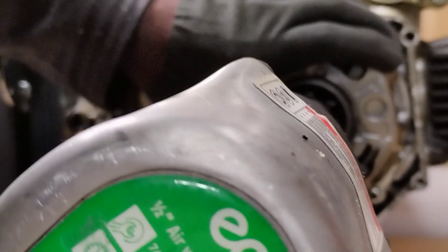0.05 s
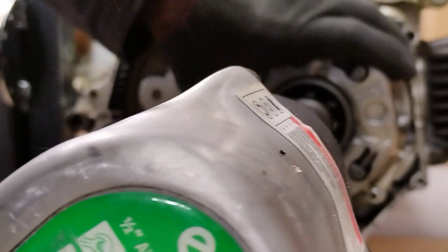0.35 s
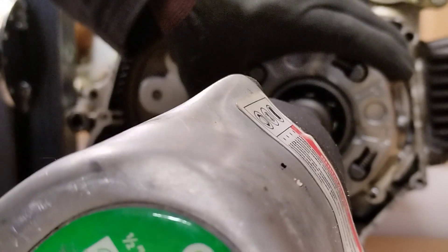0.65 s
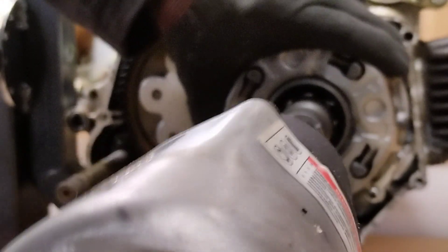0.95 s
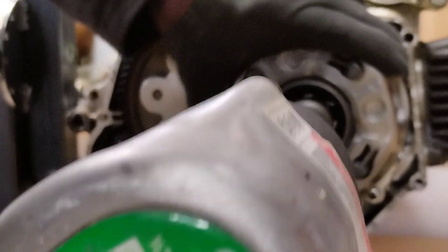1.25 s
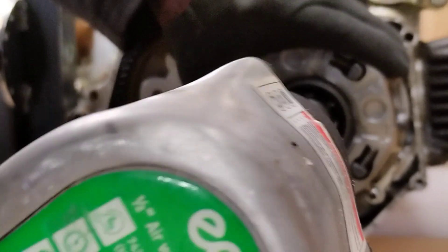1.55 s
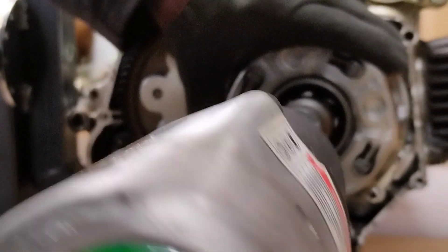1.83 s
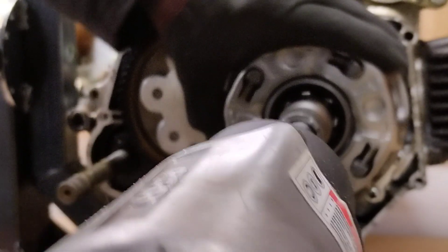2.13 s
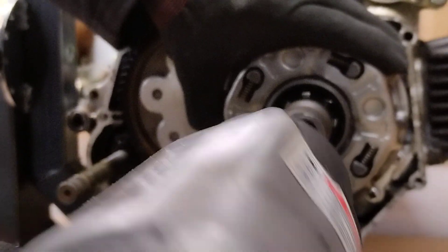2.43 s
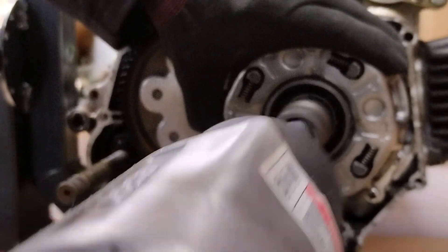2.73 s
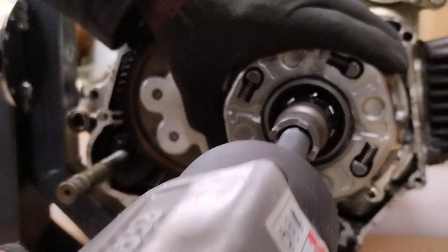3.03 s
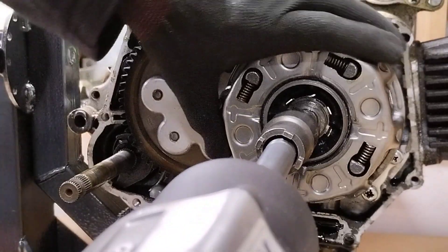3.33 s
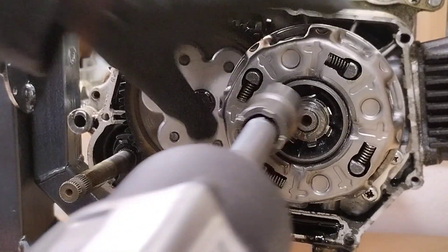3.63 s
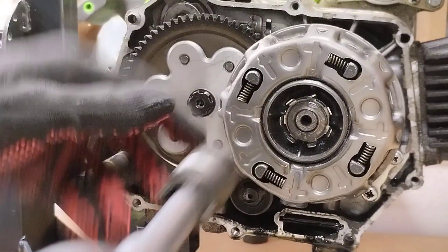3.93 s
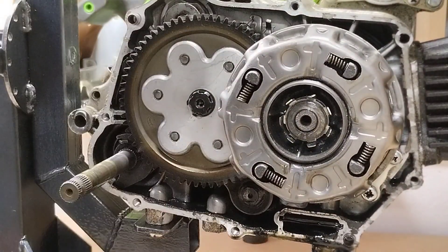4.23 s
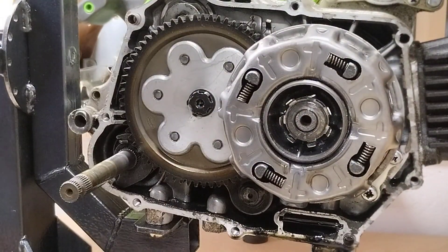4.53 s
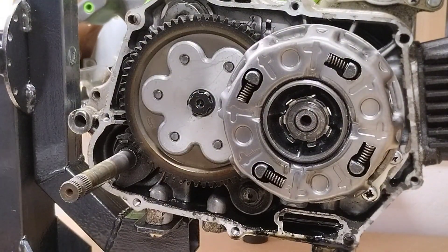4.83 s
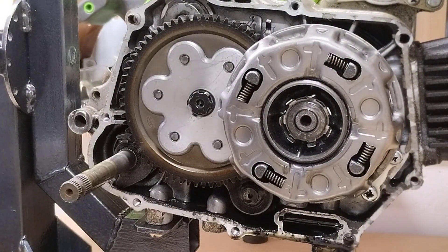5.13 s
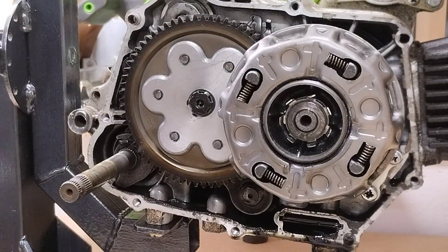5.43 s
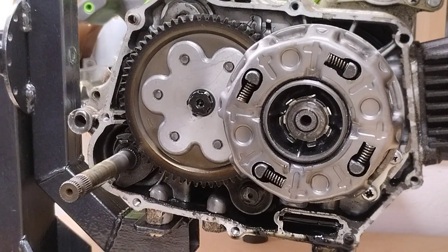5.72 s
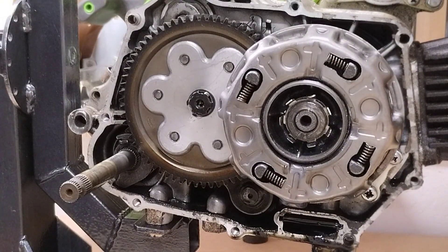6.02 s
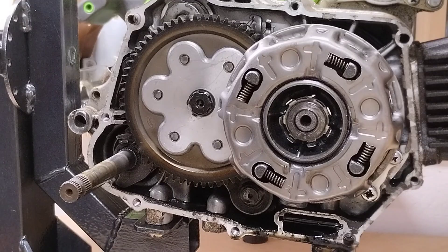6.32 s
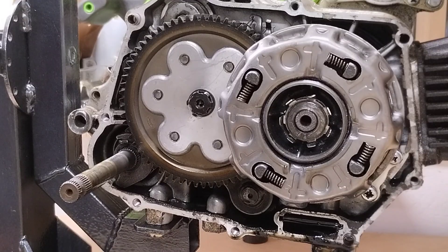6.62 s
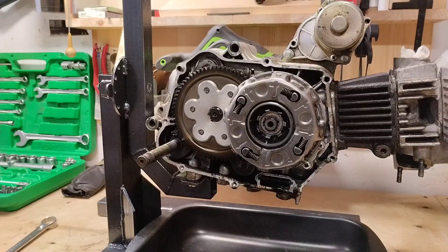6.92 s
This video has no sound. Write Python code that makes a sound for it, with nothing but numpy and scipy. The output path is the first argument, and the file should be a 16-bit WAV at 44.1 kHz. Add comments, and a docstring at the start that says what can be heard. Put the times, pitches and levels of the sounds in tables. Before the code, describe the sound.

Short hissing, clacking bursts of an air impact wrench loosen a nut, followed by small clinks and a tool thudding onto a wooden bench.

```python
"""In a workshop, an air impact wrench undoes a small engine's clutch nut in five pulls of the trigger.
Air hisses in and spins a motor, whose vanes (sliding blades) each let out a puff. A steel hammer strikes
and stalls the motor again and again, until the nut runs free and the motor coasts down.
The nut rattles, the socket clinks off the shaft, and the wrench is laid on the wooden bench.
Gloves rustle, moving air rumbles softly, and the room adds a short echo."""
import sys
import numpy as np
from scipy import signal
from scipy.fft import rfft, irfft, next_fast_len
from scipy.io import wavfile

SR = 44100
rng = np.random.default_rng(int(sys.argv[2]) if len(sys.argv) > 2 else 0)


def materialize(psi):
    """Save the field psi as 16-bit PCM at rate SR to the path in sys.argv[1].

    A 1-D psi becomes a single channel; in a 2-D psi each row is a channel.
    """
    bounded = np.clip(np.atleast_2d(psi).T, -1, 1)
    quanta = np.round(bounded * 32767).astype(np.int16)
    wavfile.write(sys.argv[1], SR, quanta)


N = 311787
T = np.arange(N) / SR
NUT_FREE_S = 2.582
HISS_FOLLOWS = 0.5   # dB of exhaust hiss per dB of drive (how hard the motor is pushed)

# Table levels are relative: each function adds its own gain. A t60 is the time taken to fade by 60 dB.
# trigger pulls: press/s, let go/s, inrush/dB, gust afterwards/dB
PULLS = [(.911, 1.033, -20.5, -26), (1.261, 1.487, -8.5, -26.5), (1.699, 1.938, -8.5, -23),
         (2.134, 2.288, -4.5, -30.5), (2.507, 2.649, -22, -11)]
# hammer strokes: slip/s, spin-up/s, top speed/(puffs per s), drive/dB, landing/dB
STROKES = [(.977, 0.041, 257, -3.5, 2), (1.292, 0.044, 235, -5, -1), (1.366, .0426, 260, -4, 3.5),
           (1.4385, .0425, 235, -4, 0.5), (1.7159, .042, 252, -1, 0), (1.803, 0.036, 225, -5, -1.5),
           (1.886, .0424, 230, -4, -2), (2.153, 0.031, 263, 1.5, -1.5), (2.2383, 0.04, 244, -2.5, 2),
           (2.5368, 0.042, 200, 1.5, 0)]
# lone blows that only jog the motor: t/s, peak/dB, drive/dB
LONE_BLOWS = [(0.9346, 5.5, -5.5), (1.265, -4, 2.5), (1.305, -7.5, -15), (2.3203, -6.5, -9.5),
              (2.4035, -7, -27), (2.5178, -2, -26.5)]
# the coasting motor: t/s, exhaust/dB, bearings/dB
COAST = [(2.655, -32, -26), (2.695, -16, -24), (2.727, -18, -34.5), (2.745, -8.5, -22.5),
         (2.857, -18.5, -40.5), (2.921, -34.5, -42), (2.97, -46, -61)]
# things set on the bench: t/s, clatter/dB, thump/dB, hollow ring/dB
KNOCKS = [(5.023, -45.5, -43.5, -65), (5.408, -42.5, -69, -63), (5.516, -18, -24.5, -19),
          (5.545, -23, -24, -16.5), (5.753, -6, -18, -36), (5.773, -16.5, -8.5, -28.5),
          (6.294, -37.5, -58, -54)]
# the bright tick of a hard contact: f/Hz, level/dB
TICK_SPECTRUM = [(3000, -5.5), (5500, -6), (7200, 2), (8400, 4.5), (9500, -0.5), (11000, -5), (13500, -9),
                 (16000, -11.5)]


def from_db(db):
    """Turn decibels into a factor to multiply by."""
    return 10 ** (np.asarray(db) / 20)


def rms_one(x):
    """Scale a signal to an average strength (rms) of 1."""
    return x / np.sqrt(np.mean(x ** 2) + 1e-20)


def in_time(rows):
    """Join timed rows with straight lines, giving one curve for each value column."""
    times, *columns = np.transpose(rows)
    return [np.interp(T, times, column) for column in columns]


def at_hz(points, hz):
    """Read a table between its listed frequencies."""
    frequencies, values = np.transpose(points)
    return np.interp(np.log(hz), np.log(frequencies), values)


def noise(spectrum):
    """Noise of strength 1, shaped by rows of f/Hz, level/dB and falling steeply beyond them."""
    padded = next_fast_len(N)
    hz = np.fft.rfftfreq(padded, 1 / SR) + 1e-3
    skirts = 1 / np.sqrt((1 + (.8 * spectrum[0][0] / hz) ** 8) * (1 + (.8 * hz / spectrum[-1][0]) ** 8))
    shaped = rfft(rng.standard_normal(padded)) * from_db(at_hz(spectrum, hz)) * skirts
    return rms_one(irfft(shaped, padded)[:N])


def clicks(times, level_db):
    """Silence with a one-sample click at each given time."""
    out = np.zeros(N)
    out[(np.asarray(times) * SR).astype(int)] = from_db(level_db)
    return out


def fading(x, t60):
    """Turn every click into a loudness curve that dies away."""
    return signal.lfilter([1], [1, -from_db(-60 / (t60 * SR))], x + 1e-18)


def swell(middle, length):
    """A smooth rise and fall."""
    return np.exp(-np.minimum((2 * (T - middle) / length) ** 2, 50))


def ring(x, hz, t60):
    """Every click starts a pure tone that dies away."""
    decay, angle = from_db(-60 / (t60 * SR)), 2 * np.pi * hz / SR
    return signal.lfilter([0, np.sin(angle)], [1, -2 * decay * np.cos(angle), decay ** 2], x + 1e-18)


def struck(times, level_db, modes, spread_db):
    """Each blow rings an object's modes (its natural tones), each with a partly random strength."""
    out = 0
    for hz, db, t60 in modes:
        scatter_db = spread_db * rng.standard_normal(len(times))
        out = out + ring(clicks(times, level_db + db + scatter_db), hz, t60)
    return out


def resonate(x, resonances):
    """Pick out bands (f/Hz, width/Hz, level/dB) and add them with alternating signs."""
    out = 0
    for k, (hz, width, db) in enumerate(resonances):
        decay = np.exp(-np.pi * width / SR)
        feedback = [1, -2 * decay * np.cos(2 * np.pi * hz / SR), decay ** 2]
        band = signal.lfilter([1, 0, -1], feedback, x + 1e-18)
        out = out + (-1) ** k * from_db(db) * (1 - decay ** 2) / 2 * band
    return out


def background(level_db=-63):
    """A faint, steady rumble and hiss."""
    # the quiet room: f/Hz, level/dB
    room_spectrum = [(35, -37), (60, -9.5), (76, -10.5), (149, -15), (233, -14), (579, -20), (1250, -24.5),
                     (5090, -31.5), (8510, -28), (14600, -37.5), (16000, -47.5)]
    return from_db(level_db) * noise(room_spectrum)


def draught(level_db=5, shake_db=-8, shake_t60=0.66, blast_db=1, blast_rise_s=0.0044, blast_t60=0.16):
    """Slow pressure swings on the microphone: room air, gusts, the shaking bench, the freed motor."""
    # drifting room air: t/s, level/dB
    drift = [(0, -34), (.9, -42), (2.4, -40), (3.3, -28.5), (4.0, -44), (4.9, -45.5), (5.2, -39.5),
             (6.1, -32), (6.6, -47), (7.07, -35)]
    # the rumble of moving air: f/Hz, level/dB
    rumble = [(4, 10.5), (12, 6), (25, -12.5), (50, -15), (100, -32.5), (200, -40.5), (400, -59.5)]
    gusts = sum(from_db(db) * swell(let_go + 0.1, length=0.32) for _, let_go, _, db in PULLS)
    times, _, thump_db, _ = np.transpose(KNOCKS)
    shaking = fading(clicks(times, thump_db + shake_db), shake_t60)
    since = np.maximum(T - NUT_FREE_S + blast_rise_s, 0)
    blast = (1 - np.exp(-since / blast_rise_s)) * from_db(blast_db - 60 * since / blast_t60)
    return from_db(level_db) * (from_db(in_time(drift)[0]) + gusts + shaking) * noise(rumble) - blast


def handling(swish_db=-2, rub_db=-3, grain_db=3.5, resting_db=-73):
    """Gloves, sleeve and hose slide in small uneven slips."""
    # movements: middle/s, length/s, swish/dB, rub/dB
    moves = [(0.0, 0.08, -55, -60), (0.31, 0.32, -54.5, -60), (.5, 0.044, -64, -66),
             (3.45, 0.061, -70, -61), (3.861, 0.12, -75, -56.5), (4.162, 0.064, -60, -72),
             (4.572, 0.18, -55, -53.5), (4.76, 0.1, -67, -73), (5.265, 0.33, -63, -65.5),
             (6.2, 0.056, -72, -64), (7.022, 0.17, -57, -66)]
    # the bright swish and the duller rub: f/Hz, level/dB
    swish_spectrum = [(1760, -28.5), (3000, -7.5), (3240, -2), (3730, -7.5), (5400, -6), (8520, 3),
                      (14300, -13.5), (16000, -20)]
    rub_spectrum = [(550, -2.5), (1200, 1.5), (2000, -3), (3000, -10.5), (5000, -16)]
    swish = rub = from_db(resting_db)
    for middle, length, high_db, low_db in moves:
        move = swell(middle, length)
        swish = swish + from_db(high_db) * move
        rub = rub + from_db(low_db) * move
    slips = from_db(grain_db * noise([(5, 0.5), (150, -12.5)]))
    swish = from_db(swish_db) * swish * noise(swish_spectrum)
    rub = from_db(rub_db) * rub * noise(rub_spectrum)
    return slips * (swish + rub)


def clinks(tick_db=-2, tick_t60=0.037, body_t60=0.027, socket_db=-18, give_s=0.0063, touches_per_s=1.5):
    """Light metal contacts; pulling the socket off also sets the clutch drum humming."""
    # socket, nut and tool touching: t/s, tick/dB, body/dB
    contacts = [(0.19, -38.5, -41.5), (2.738, -17, -28), (2.82, -14, -22.5), (2.902, -19, -21.5),
                (2.921, -26, -38), (2.998, -35, -32.5), (3.02, -54, -29.5), (3.122, -60, -39.5),
                (3.195, -25.5, -15.5), (3.229, -34, -38), (3.592, -49, -62), (4.189, -21.5, -31.5),
                (4.242, -27, -25.5), (4.246, -23, -38), (4.591, -58, -34.5), (5.262, -35.5, -34.5),
                (5.649, -36.5, -34)]
    # the lower body of a clink: f/Hz, level/dB
    body_spectrum = [(1300, -7), (1750, 6.5), (2100, -1), (2500, -1.5), (3100, -4), (4500, -16.5)]
    # nudges to the clutch drum: t/s, level/dB
    drum_nudges = [(3.2, -23.5), (3.434, -40)]
    # tones of the socket and of the drum: f/Hz, level/dB, t60/s
    socket_modes = [(1040, -9.5, .1), (1510, -9.5, .1), (1950, -8.5, .08), (2092, -4, 0.076),
                    (3074, -10.5, .08), (7500, -12, .07), (8170, -8, .07)]
    drum_modes = [(133, -3.5, 0.13), (218.3, -14.5, 0.32), (271, -6.5, 0.21), (375.8, 2.5, 0.22),
                  (506, -6, 0.12)]
    touch_times = T[rng.random(N) < touches_per_s / SR]
    faint_touches = [(t, *rng.normal(-59.5, 2.5, 2)) for t in touch_times]
    times, peak_db, low_db = np.transpose(contacts + faint_touches)
    tick = fading(clicks(times, peak_db + tick_db), tick_t60) * noise(TICK_SPECTRUM)
    body = fading(clicks(times, low_db), body_t60) * noise(body_spectrum)
    nudges = clicks(*np.transpose(drum_nudges))
    rise_t60 = give_s * np.log(1000)   # the drum takes up its vibration gradually from the shaft
    drum = sum(from_db(db) * (ring(nudges, hz, t60) - ring(nudges, hz, rise_t60))
               for hz, db, t60 in drum_modes)
    return tick + body + drum + struck(times, low_db + socket_db, socket_modes, spread_db=8.0)


def trigger(opening_t60=0.026, filling_t60=0.063):
    """The hiss swells as the valve cracks open and fades as the motor chamber fills."""
    # air rushing in: f/Hz, level/dB
    inrush_spectrum = [(250, 2.5), (700, -5), (1000, -5), (1260, 5), (1550, -4), (2050, -3), (2550, 4),
                       (3200, -12), (5000, -8.5), (9000, -8), (16000, -21)]
    times, _, inrush_db, _ = np.transpose(PULLS)
    peaks = clicks(times, inrush_db)
    opening = fading(peaks[::-1], opening_t60)[::-1]   # a backwards fade makes a swell
    return np.maximum(opening, fading(peaks, filling_t60)) * noise(inrush_spectrum)


def motor_runs(stall_per_s=113, overrun_s=.008, jog_s=.02, recoil_delay_s=.09, recoil_s=.032):
    """List the motor's runs: start/s, end/s, first and last speed/(puffs per s), drive/dB."""
    strokes = [(t, t + spin + overrun_s, stall_per_s, top, db) for t, spin, top, db, _ in STROKES]
    jogs = [(t, t + jog_s, stall_per_s, 150, db) for t, _, db in LONE_BLOWS]
    # the motor turns over softly after the trigger is let go
    recoils = [(t + recoil_delay_s, t + recoil_delay_s + recoil_s, stall_per_s, stall_per_s, -16.5)
               for _, t, _, _ in PULLS[:-1]]
    racing_free = (NUT_FREE_S, PULLS[-1][1], 170, 229, -0.5)
    return strokes + jogs + recoils + [racing_free]


def vanes(puffs_per_s, spread_db=1.5):
    """One click each time a vane uncovers the exhaust hole."""
    passed = np.floor(np.cumsum(puffs_per_s) / SR)
    return (np.diff(passed, prepend=-1) > 0) * from_db(spread_db * rng.standard_normal(len(passed)))


def driven_motor(puff_db=36, stand_db=36, hiss_db=-19.5, churn_db=-6, kick_db=-5,
                 valve_t60=0.028, puff_t60=0.022, throb=0.37):
    """Air speeds the motor up; each vane lets out a puff and a spurt of hiss, and shakes the stand."""
    # resonances of the exhaust and of the engine on its steel stand: f/Hz, width/Hz, level/dB
    exhaust_bands = [(93, 120, -12), (269, 94.7, -2), (460, 180, -10), (650, 190, -15), (1260, 110, -25),
                     (1707, 90, -17), (2530, 140, -26.5)]
    stand_bands = [(83, 6.1, 3), (201.4, 6.4, -12), (251, 5.9, -8.5), (322, 2.2, -2.5), (451, 13, -9)]
    # the exhaust's hiss: f/Hz, level/dB
    jet_spectrum = [(500, -9.5), (1300, 1), (2500, -1), (4000, -1.5), (6000, -3.5), (7200, 3.5), (8000, 2),
                    (9000, 4), (10500, -4), (13000, -10.5), (16000, -17.5)]
    puffs, spurts, flow = np.zeros((3, N))
    # the hammer jerks the motor while the nut holds
    judder = 1 + .2 * noise([(20, 0), (120, 0)]) * (T < NUT_FREE_S)
    for start, end, first, last, drive_db in motor_runs():
        span = slice(int(start * SR), int(end * SR))
        progress = np.linspace(0, 1, span.stop - span.start)
        rate = first + (last - first) * progress * (3 - progress) / 2
        openings = vanes(rate * judder[span])
        spurts[span] += openings
        puffs[span] += openings * from_db(drive_db)
        flow[span] = np.maximum(flow[span], from_db(HISS_FOLLOWS * drive_db))
    puffs += clicks([pull[0] for pull in PULLS], kick_db)   # the first air of a pull kicks the motor
    flow = fading(flow, valve_t60) * (1 - from_db(-60 / (valve_t60 * SR)))   # eases in and out
    hiss = noise(jet_spectrum)
    churn = from_db(churn_db) * noise([(90, -1), (270, 0.5), (450, -2.5), (800, -12)])
    jet = flow * (1 - throb + 3 * throb * fading(spurts, puff_t60)) * (hiss + churn)
    exhaust = from_db(puff_db) * resonate(puffs, exhaust_bands)
    stand = from_db(stand_db) * resonate(puffs, stand_bands)
    return exhaust + stand + from_db(hiss_db) * jet


def hammer(crack_db=-3, crack_t60=0.032, casing_db=-15, casing_t60=0.039, casing_follows=0.86,
           anvil_db=-3, slip_db=0.5, bounce_s=0.015, bounce_db=-12):
    """The hammer slips off the anvil (the shaft holding the socket), then hits it, steel on steel."""
    # the crack of steel, and the crash of the tool and engine casings: f/Hz, level/dB
    steel_spectrum = [(1760, -38), (3000, -7.5), (6090, -11), (7300, 6.5), (8110, -4), (9200, -2.5),
                      (10400, -11.5), (11700, -4.5), (13800, -14.5), (15100, -22.5), (16000, -11)]
    casing_spectrum = [(350, -41), (600, -1.5), (930, -5), (1260, 4.5), (1480, 1.5), (1990, -11.5),
                       (2470, 3), (3050, -6.5), (3320, -9), (3900, -17), (4500, -2.5), (5850, -41),
                       (9900, -120)]
    # tones of the anvil: f/Hz, level/dB, t60/s
    anvil_modes = [(7050, -5, .035), (7100, -17, 0.011), (8260, -15, 0.037), (8200, -13, .04),
                   (8900, -14, 0.06)]
    slips = [(t, drive_db + slip_db) for t, _, _, drive_db, _ in STROKES]
    landings = [(t + spin, db) for t, spin, _, _, db in STROKES]
    blows = slips + landings + [(t, db) for t, db, _ in LONE_BLOWS]
    bounces = [(t + bounce_s * rng.uniform(0.46, 1.4), db + bounce_db) for t, db in blows]
    times, peak_db = np.transpose(blows + bounces)
    crack = fading(clicks(times, peak_db + crack_db), crack_t60) * noise(steel_spectrum)
    casing_hits = clicks(times, casing_follows * peak_db + casing_db)
    casing = fading(casing_hits, casing_t60) * noise(casing_spectrum)
    return crack + casing + struck(times, peak_db + anvil_db, anvil_modes, spread_db=1)


def venting(level_db=-35, vent_t60=1.0):
    """After each run, the air left in motor and hose leaks away softly."""
    _, ends, _, _, drive_db = np.transpose(motor_runs())
    power = fading(clicks(ends, 2 * HISS_FOLLOWS * drive_db), vent_t60 / 2)
    air_left = np.interp(T, [NUT_FREE_S, COAST[-1][0]], [1, 0])   # the freed motor empties its chamber
    hiss = noise([(300, 3), (700, 0.5), (2000, -0.5), (4500, -1.0), (8500, -1.0), (12000, -13.5)])
    return from_db(level_db) * np.sqrt(power) * air_left * hiss


def pings():
    """Small steel parts, left free to ring, each give one high tone."""
    # ringing parts: t/s, f/Hz, level/dB, t60/s
    tones = [(1.306, 14700, -13, 0.071), (1.447, 14560, -19, .08), (3.195, 13900, -43, 0.13),
             (4.61, 13240, -50, 0.16), (5.784, 10450, -39, 0.087), (6.297, 4240, -56, 0.11)]
    return sum(ring(clicks([t], db), hz, t60) for t, hz, db, t60 in tones)


def coasting_motor(puff_db=-1, flutter_db=-6, hiss_db=-3):
    """With the trigger let go, the motor runs down unsteadily, puffing softly as its bearings whirr."""
    # the motor's speed: t/s, speed/(puffs per s)
    speed = [(2.65, 215), (2.7, 190), (2.745, 142), (2.8, 110.6), (2.89, 130), (2.97, 84)]
    # hiss while coasting: f/Hz, level/dB
    hiss_spectrum = [(880, -42), (1500, -12.5), (1670, -3.5), (1830, -2.5), (2510, -1), (5170, -7.5),
                     (9190, 0.5), (10200, -17), (14500, -16), (16000, -24.5)]
    rate, = in_time(speed)
    exhaust_db, bearing_db = in_time(COAST)
    wobble = 1 + .06 * noise([(15, 0), (80, 0)])
    puffs = resonate(vanes(rate * wobble), [(217.0, 43, 2.5), (392, 218, -15.5), (605.6, 130, -13.5)])
    flutter = noise([(100, -8.5), (240, -4), (450, -15), (1000, -26.5)])
    exhaust = from_db(puff_db) * rms_one(puffs) + from_db(flutter_db) * flutter
    whirr = rms_one(resonate(rng.standard_normal(N), [(1210, 43, 1), (1660, 280, -14.0)]))
    bearings = whirr + from_db(hiss_db) * noise(hiss_spectrum)
    sound = from_db(exhaust_db) * exhaust + from_db(bearing_db) * bearings
    return sound * (T > COAST[0][0]) * (T < COAST[-1][0])


def loose_nut(touches_per_s=170, level_db=-4, spread_db=4):
    """The freed nut rattles in the spinning socket, more softly as the motor slows."""
    # resonances of the nut: f/Hz, width/Hz, level/dB
    nut_bands = [(6400, 500, -16), (9180, 354, 1.5), (10500, 550, -11.5), (12400, 265, 1),
                 (14600, 400, -5.5)]
    _, bearing_db = in_time(COAST)
    touches = rng.random(N) < touches_per_s / SR
    strength = from_db(spread_db * np.clip(rng.standard_normal(N), -2, 2))
    rattle = rms_one(resonate(touches * strength, nut_bands))
    return from_db(bearing_db + level_db) * rattle * (T > COAST[0][0]) * (T < COAST[-1][0])


def bench(board_db=-3, board_t60=0.23, thump_db=-3, hollow_db=-2, tick_db=-23, tick_t60=0.021):
    """Knocks make the wooden top clatter, thump and ring; hard contacts add a tick."""
    # the clatter of wood: f/Hz, level/dB
    board_spectrum = [(200, -0.5), (380, 3), (550, 3), (900, -1.5), (1200, -5.5), (1520, -6.5),
                      (1900, -14.5), (2600, -18.5), (4000, -30.5), (7000, -34), (10500, -40),
                      (14000, -64.5)]
    # tones of the thump and of the hollow ring: f/Hz, level/dB, t60/s
    thump_modes = [(75.2, -8, 0.55), (98.1, -11, 0.18), (133, 6, 0.21), (218, -4.5, 0.1385),
                   (566, -11, 0.15), (945, -17, .18), (1485, -20.5, 0.24), (1500, -15, 0.17)]
    hollow_modes = [(247.8, -4.5, 0.27), (392.7, 4.5, 0.24), (421.3, -11.5, 0.15), (676, -8, 0.23),
                    (798, -15, 0.11), (1540, -13, .3)]
    times, peak_db, low_db, ring_db = np.transpose(KNOCKS)
    clatter = fading(clicks(times, peak_db + board_db), board_t60) * noise(board_spectrum)
    hardness_db = 2 * peak_db - peak_db.max()   # treble grows faster than the force of the blow
    tick = fading(clicks(times, hardness_db + tick_db), tick_t60) * noise(TICK_SPECTRUM)
    thump = struck(times, low_db + thump_db, thump_modes, spread_db=3)
    hollow = struck(times, ring_db + hollow_db, hollow_modes, spread_db=5.5)
    return clatter + tick + thump + hollow


def workshop_echo(x, build_s=0.00093, length_s=.7):
    """A wash of echoes builds up quickly; low notes linger longest."""
    # how long the room rings: f/Hz, t60/s
    fade_times = [(100, 0.75), (400, 0.49), (2000, 0.39), (8000, 0.4), (16000, 0.18)]
    # the tone of the echoes: f/Hz, level/dB
    colour = [(80, 2.5), (300, -2), (1000, 4), (3000, 5), (8000, 0), (16000, 9)]
    t, echo = T[:int(length_s * SR)], 0
    edges = np.geomspace(60, 18000, 11)
    for low, high in zip(edges, edges[1:]):
        hz = np.sqrt(low * high)
        band_filter = signal.butter(2, [low, high], "band", fs=SR, output="sos")
        band = signal.sosfilt(band_filter, rng.standard_normal(len(t)))
        echo = echo + band * from_db(at_hz(colour, hz) - 60 * t / at_hz(fade_times, hz))
    echo = echo * (1 - np.exp(-t / build_s))
    return signal.fftconvolve(x, echo / np.sqrt(np.sum(echo ** 2)))[:N]


def scene(room_db=-9, width_db=-14, width_hz=4300):
    """Everything is close and central; only the treble of the echoes spreads to the sides."""
    wrench = trigger() + driven_motor() + venting() + coasting_motor() + hammer() + loose_nut()
    near = wrench + pings() + clinks() + bench() + handling()
    mid = near + from_db(room_db) * workshop_echo(near) + draught() + background()
    treble_filter = signal.butter(14, width_hz, "high", fs=SR, output="sos")
    side = signal.sosfilt(treble_filter, workshop_echo(near))
    return mid + from_db(width_db) * side * [[1], [-1]]


def record(dry):
    """Squash the loudest peaks in both channels alike, and cut the treble above 16000 Hz."""
    squashed = dry / (1 + np.abs(dry.mean(axis=0)) ** 6) ** (1 / 6)
    return signal.sosfilt(signal.ellip(10, .2, 70, 16000, fs=SR, output="sos"), .93 * squashed)


dry = scene()
out = record(dry)
materialize(out)
```